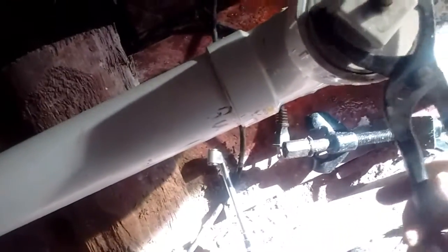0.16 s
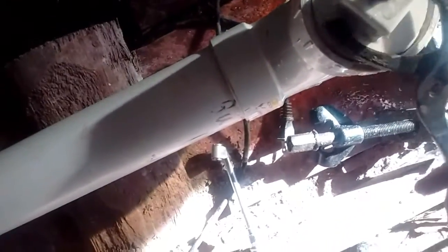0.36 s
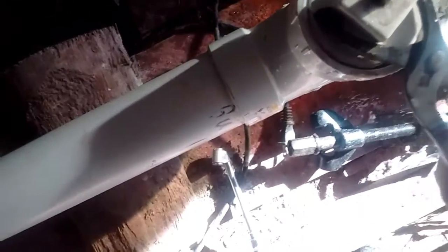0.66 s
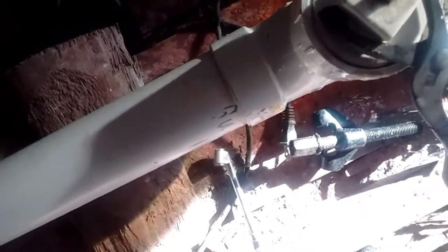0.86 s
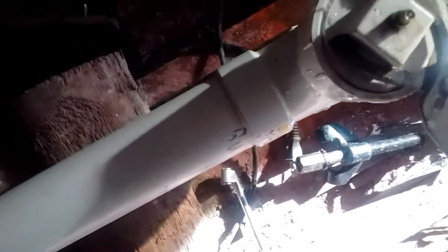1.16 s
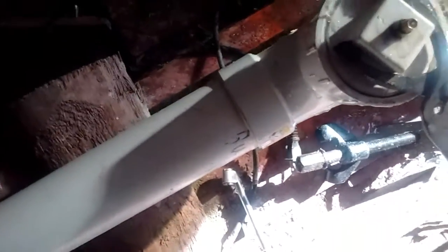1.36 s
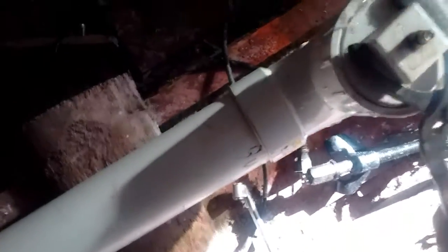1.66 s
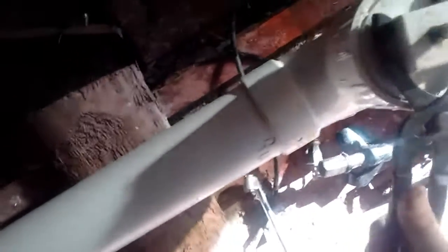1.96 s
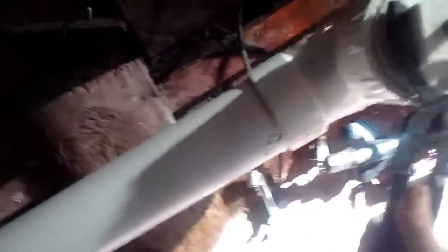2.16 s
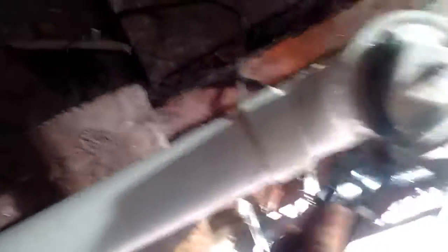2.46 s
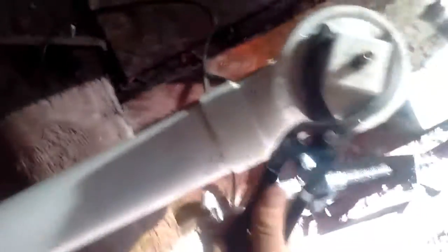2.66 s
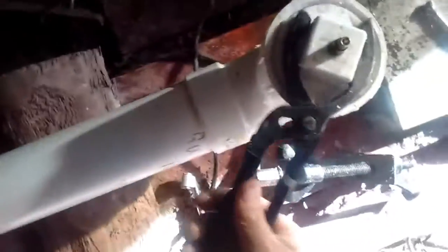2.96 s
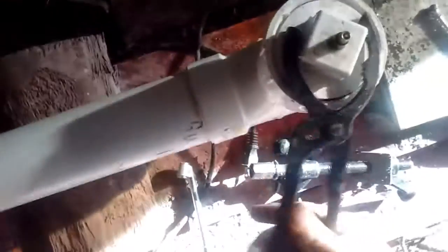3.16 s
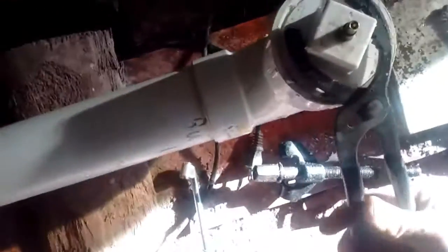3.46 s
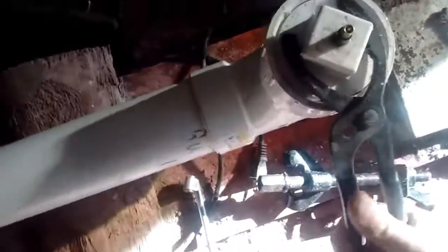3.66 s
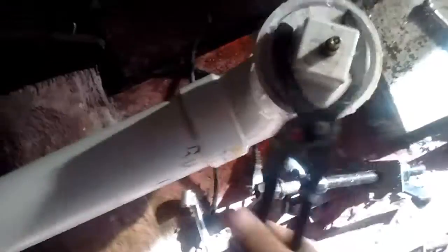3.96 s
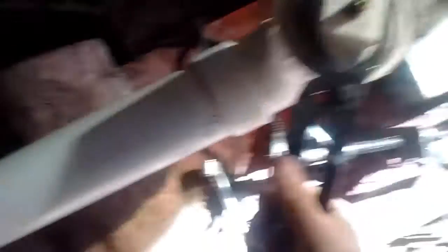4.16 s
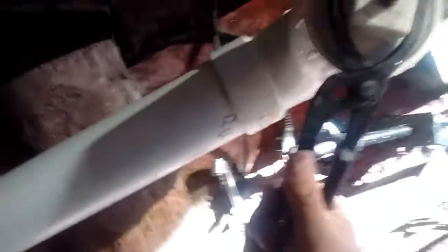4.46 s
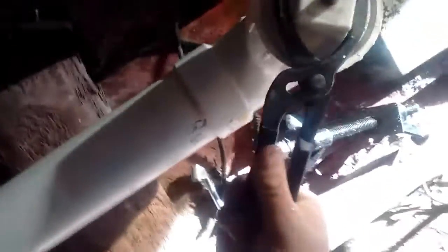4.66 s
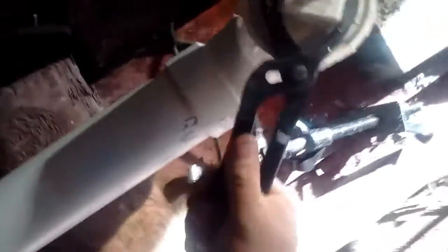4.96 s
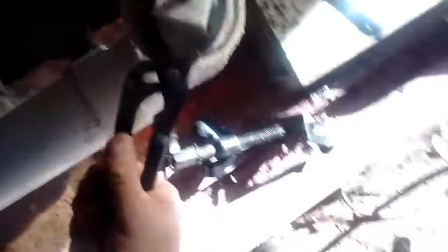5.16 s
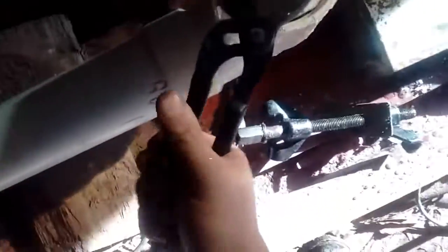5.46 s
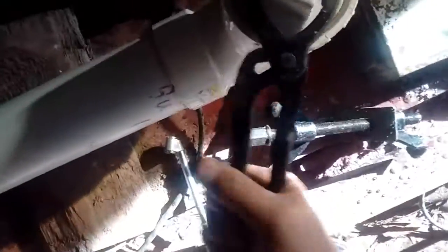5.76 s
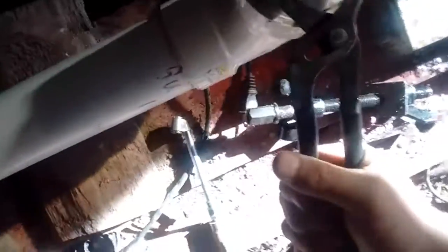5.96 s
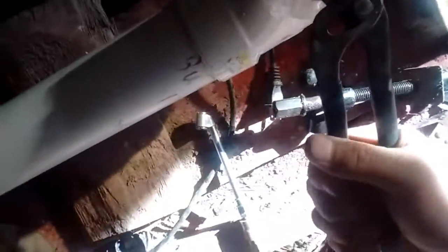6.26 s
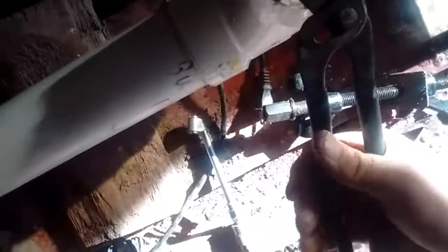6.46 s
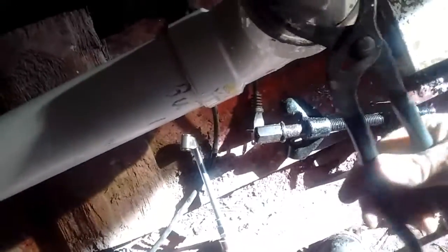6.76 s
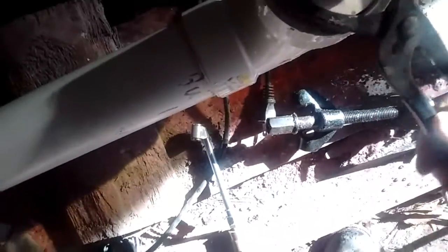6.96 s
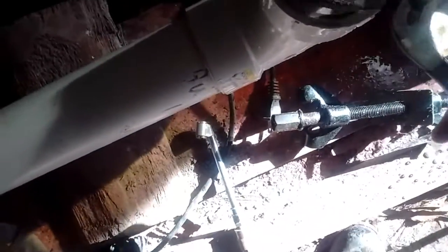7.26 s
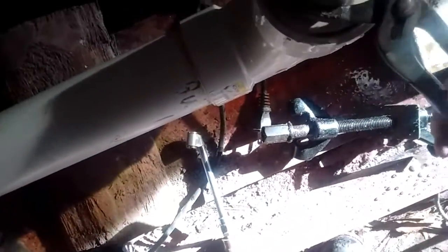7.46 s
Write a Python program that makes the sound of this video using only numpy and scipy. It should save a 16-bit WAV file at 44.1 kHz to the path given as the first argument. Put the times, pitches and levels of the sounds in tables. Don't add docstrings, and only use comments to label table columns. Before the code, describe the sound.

A leak at a plastic pipe first sputters rapidly, crackling and bubbling, with run-off splashing on brick. The spurts then merge into a continuous airy hiss of varying strength. Pliers rub, scuff and knock the hollow pipe, giving low, short thuds and a few sharp clicks, strongest near four and six seconds. Low wind buffets the close, dry microphone; the hiss is full at the end.

```python
import sys
import numpy as np
from scipy import signal
from scipy.fft import rfft, irfft, next_fast_len
from scipy.io import wavfile
from scipy.ndimage import uniform_filter1d

SR = 44100
rng = np.random.default_rng(int(sys.argv[2]) if len(sys.argv) > 2 else 0)


def to_linear_factor(level_db):
    exponent = np.asarray(level_db, float) / 20
    return 10 ** exponent


def inscribe(sig):
    pcm = np.round(np.clip(np.atleast_2d(sig).T, -1, 1) * 32767)
    wavfile.write(sys.argv[1], SR, pcm.astype(np.int16))


N = 335601
T_S = np.arange(N) / SR
STEADY_S = 2.32


def evened(x):
    return x / np.sqrt(np.mean(x ** 2) + 1e-20)


def curve(rows, column):
    rows = np.array(rows)
    return np.interp(T_S, rows[:, 0], rows[:, column])


def add(mix, start_s, sound):
    part = mix[max(round(start_s * SR), 0):][:len(sound)]
    part += sound[:len(part)]


def coloured(x, colour):
    colour_hz, colour_db = np.transpose(colour)
    size = next_fast_len(N)
    hz = np.fft.rfftfreq(size, 1 / SR)
    gain_db = np.interp(np.log(hz + 1), np.log(colour_hz), colour_db, -90, -90)
    return evened(irfft(rfft(x, size) * to_linear_factor(gain_db), size)[:N])


def patchy(patch_db, flicker_db, size=256):
    frames = 4 * N // size + 5
    a, b, patches = rng.standard_normal((frames, size // 2 + 1, 3)).T
    patches = uniform_filter1d(patches, size=4, axis=0)
    patches = evened(uniform_filter1d(patches, size=24, axis=1))
    flicker = evened(uniform_filter1d(rng.standard_normal(frames), size=5))
    z = (a + 1j * b) * to_linear_factor(patch_db * patches + flicker_db * flicker)
    return evened(signal.istft(z, nperseg=size, noverlap=3 * size // 4)[1][:N])


def crackle(per_s, spread_db):
    place, size, sign = rng.random((round(per_s * N / SR), 3)).T
    out = np.zeros(N)
    size_db = spread_db * np.minimum(-np.log(size + 1e-9), 4.2)
    out[(place * N).astype(int)] = to_linear_factor(size_db) * np.sign(sign - .5)
    return evened(out)


def wobble():
    return evened(uniform_filter1d(rng.standard_normal(N), size=300))


def resonate(x, hz, width_hz):
    turn = np.exp(2j * np.pi * np.cumsum(hz) / SR)
    r = np.exp(-np.pi * width_hz / SR)
    return 2 * (turn * signal.lfilter([1 - r], [1, -r], x / turn)).real


def struck(events, partners, rise_s, rough):
    out = np.zeros(N)
    chance = rng.standard_normal((len(events), 5000))
    t = np.arange(5000) / SR
    for (start_s, db, hz, t60_s, upper_db), noise in zip(events, chance):
        ring = np.sin(2 * np.pi * hz * t)
        ring += rough * evened(resonate(noise, hz + 0 * t, 0.74 * hz))
        for ratio, level_db in partners:
            ring += to_linear_factor(level_db + upper_db) * np.sin(2 * np.pi * hz * ratio * t)
        decay = to_linear_factor(db - 60 * t / max(t60_s, .003))
        add(out, start_s, ring * decay * (1 - np.exp(-t / rise_s)))
    return out


def swells(rows, rise_db_per_s, fall_db_per_s, floor_db):
    t = np.arange(0, N, 32) / SR
    db = np.full(len(t), -120.)
    for (start_s, hold_s, top_db), up, down in zip(rows, rise_db_per_s, fall_db_per_s):
        before_s = np.maximum(start_s - t, 0)
        after_s = np.maximum(t - start_s - hold_s, 0)
        db = np.maximum(db, top_db - up * before_s - down * after_s)
    return np.maximum(to_linear_factor(db).repeat(32)[:N], to_linear_factor(floor_db))


# start_s, level_db (relative to spurts), shade_db
SEEP = [
    (0.0, -16.5, 3.5),
    (0.85, -17, -0.5),
    (1.0, -9, 1),
    (1.7, -12, 5),
    (1.95, -16.5, 5),
    (2.25, -10.5, 3),
]
# start_s, level_db, shade_db (by the pliers)
JET = [(2.32, -46.5, 6), (2.45, -35.5, 5), (2.62, -48, 8), (2.76, -46, 2), (3.22, -43, 1), (3.4, -51, 3),
       (3.97, -45, -0.5), (4.08, -51.5, 4), (4.48, -53, 8), (4.62, -42.5, 1), (5.12, -38.5, 2),
       (5.24, -46.5, 10.5), (5.43, -37, 0.5), (5.88, -36, 1), (5.98, -41, 0), (6.87, -37, -2),
       (7.0, -44, 1), (7.61, -38, -2)]


def gap(column):
    return np.where(T_S < STEADY_S, curve(SEEP, column), curve(JET, column))


# pitch_hz, level_db (per Hz)
JET_COLOUR = [(3710, -16), (6300, -18), (7850, -0.5), (8220, -1), (8730, -5.5), (9420, -11.5),
              (10200, -10.5), (11400, -15.5), (12700, -13.5), (14100, -19), (14900, -19.5), (15600, -11.5)]
# start_s, level_db (rms), length_s
SPURTS = [(0.044, -47, 0.022), (0.103, -45.5, 0.016), (0.199, -43, 0.014), (0.264, -46.5, 0.018),
          (0.333, -46, 0.025), (0.398, -41, 0.017), (0.465, -41, 0.033), (0.538, -39.5, 0.014),
          (0.587, -42, 0.023), (0.623, -39.5, 0.014), (0.673, -38, 0.036), (0.753, -36.5, 0.026),
          (0.797, -33.5, 0.0091), (0.828, -32, 0.021), (0.935, -33.5, 0.018), (1.161, -45, 0.039),
          (1.224, -44, 0.02), (1.268, -47, 0.02), (1.307, -42, 0.017), (1.339, -44, 0.029),
          (1.453, -42.5, 0.021), (1.52, -44.5, 0.027), (1.635, -44, 0.027), (1.697, -30.5, 0.0047),
          (1.752, -48, 0.036), (1.83, -46.5, 0.03), (1.896, -37.5, 0.005), (2.112, -39, 0.004),
          (2.172, -48, 0.02), (2.244, -49.5, 0.025)]
# start_s, peak_db, length_s
SPITS = [(0.177, -35, 0.009), (0.1864, -40, 0.009), (0.4324, -33, 0.009), (0.45, -30, 0.009),
         (0.495, -35, 0.009), (0.732, -30, 0.009), (0.8929, -28, 0.009), (0.9024, -33, 0.009),
         (0.9178, -24, 0.009), (0.9802, -31, 0.009), (1.0056, -30, 0.009), (1.0294, -34, 0.009),
         (1.0444, -33, 0.009), (1.0594, -29, 0.009), (1.0794, -33, 0.009), (1.0974, -33, 0.009),
         (1.1218, -33, 0.009), (1.14, -31, 0.009), (1.18, -34, 0.009), (1.4217, -36, 0.009),
         (1.482, -31, 0.009), (1.5658, -33, 0.009), (1.595, -37, 0.009), (1.607, -34, 0.009),
         (2.0617, -39, 0.009), (2.2614, -38, 0.009), (2.2822, -32, 0.009), (2.319, -30, 0.009)]
# start_s, peak_db
TICKS = [(0.2864, -44), (0.2997, -41), (0.3606, -34), (0.4194, -34), (1.3862, -32), (1.7144, -42),
         (1.7344, -38), (1.7994, -45), (1.8771, -30), (1.9044, -42), (1.929, -40), (1.9644, -43),
         (2.0168, -38), (2.0344, -39), (2.0744, -47), (2.1294, -42), (2.1944, -47), (2.2154, -44),
         (2.3032, -30), (2.3344, -32)]


def jet():
    crest_db, tick_s = 9, .003
    spits = [(s, db - crest_db, length_s) for s, db, length_s in SPITS]
    spits += [(s, db - crest_db + 1.5, tick_s) for s, db in TICKS]
    usual_db = uniform_filter1d(curve(sorted(SPURTS + spits), 1), size=4000)
    spurts = np.zeros(N)
    for start_s, db, length_s in SPURTS + spits:
        t = np.arange(0, length_s + 0.016, 1 / SR)
        edge_s = .001 + .12 * length_s
        rise = 1 - np.exp(-t / edge_s)
        fall = np.exp(-np.maximum(t - 0.8 * length_s, 0) / edge_s)
        add(spurts, start_s - .001, to_linear_factor(db - 2.0) * rise * fall)
    steady = to_linear_factor(gap(1) + np.where(T_S < STEADY_S, usual_db, 0))
    crackles = crackle(700, 3.5)
    hiss = coloured(patchy(1.53, 0.79) + 0.36 * crackles, JET_COLOUR) * steady
    hiss += coloured(patchy(4.0, 1.6) + 0.4 * crackles, JET_COLOUR) * spurts
    top = signal.oaconvolve(hiss, signal.firwin(101, 9600, pass_zero=False, fs=SR), "same")
    return hiss + (to_linear_factor(gap(2)) - 1) * top


# start_s, flow_db
WATER = [(0.0, -52.5), (0.14, -53.5), (0.33, -51.5), (0.69, -48.5), (1.32, -47.5), (1.66, -46), (1.98, -51),
         (2.29, -52), (3.05, -46), (3.47, -53.5), (3.82, -53.5), (4.16, -52.5), (4.96, -50), (5.85, -47.5),
         (6.1, -51), (6.87, -47), (6.97, -53), (7.61, -47.5)]


def flow_db():
    return curve(WATER, 1)


def pocket_share():
    return np.interp(T_S, [0, .4, .95, 1.15], [.85, .88, .75, .72])


# start_s, pitch_hz (first), climb_hz_per_s, level_db
GULPS = [(0., 2100, 30000, 0.1), (.065, 3000, 34000, 1), (.113, 2010, 40000, -0.5), (.15, 2700, 45000, 1),
         (.213, 2200, 41700, 0.1), (.275, 2500, 12000, 0), (.36, 2900, 34000, -2), (.418, 4000, 22000, 0.5),
         (.53, 3700, 15000, 0), (.575, 3900, 6000, 1), (.628, 4100, 4000, 2.5), (.713, 3800, 20000, 2),
         (.765, 3920, 6000, 0), (.85, 2700, 34000, 2), (.955, 4100, 6000, 0.1), (2.9, 4600, -15000, 0.1),
         (2.99, 3800, 28000, 1.2), (3.05, 3900, 2000, 0.1), (3.18, 4000, 15000, -1.5),
         (4.86, 3100, 20000, -2.5), (4.92, 3400, 20000, -2.5), (5.195, 3300, 2000, 0.5),
         (5.47, 2800, 32000, 0.5), (5.565, 3200, 9000, -2.5), (5.61, 2400, 40000, -1.5),
         (5.75, 3300, 25000, -2.5), (5.85, 3300, 25000, -2.5), (5.975, 3300, 3000, -1.5),
         (6.06, 3500, 5000, -1.5)]


def gurgle():
    rows = np.array(GULPS)
    current = np.maximum(np.searchsorted(rows[:, 0], T_S) - 1, 0)
    start_s, first_hz, climb, gulp_db = rows[current].T
    since_s = T_S - start_s
    hz = np.minimum(first_hz + climb * since_s, 5000) * (1 + .035 * wobble())
    noise = rng.standard_normal(N) * to_linear_factor(3.5 * wobble())
    pocket = evened(resonate(resonate(noise, hz, 520), hz, 520))
    level = to_linear_factor(flow_db() + gulp_db + 3.6) * pocket_share()
    return level * np.exp(-(since_s / .075) ** 4) * pocket


# pitch_hz, level_db (per Hz)
FIZZ_COLOUR = [(1290, -41), (2200, -24), (2440, -5.5), (2890, -3), (3390, -1.5), (3990, 3), (4640, 4.5),
               (5910, -4.5), (6400, -15), (8320, -43), (14100, -120)]


def fizz():
    bubbles = np.zeros(N)
    for hz, cycles in rng.uniform([3500, 8], [5200, 30], (28, 2)):
        turns = np.arange(round(cycles * SR / hz)) * hz / SR
        ring = np.sin(2 * np.pi * turns * (1 + 0.11 * turns / cycles))
        ring *= np.exp(-3 * turns / cycles) * (1 - np.exp(-turns))
        sizes = crackle(8, 4.0)
        for at in np.flatnonzero(sizes):
            add(bubbles, at / SR, sizes[at] * ring)
    spray = coloured(patchy(3.5, 2.0) + .4 * crackle(300, 3.5), FIZZ_COLOUR)
    spray *= 1.55 - pocket_share()
    return to_linear_factor(flow_db()) * (1.02 * spray + 0.45 * evened(bubbles))


def runoff_db():
    splash_db, slop_db, slop_ends_s = -4.5, 3.5, 1.795
    return flow_db() + splash_db + slop_db * np.clip((slop_ends_s - T_S) / 0.18, 0, 1)


# start_s (hardest moment), level_db, swell_db_per_s
RUBS = [(0.58, -47.5, 90), (2.27, -55, 60), (2.54, -57, 150), (2.68, -64, 150), (2.89, -63, 120),
        (3.25, -44.5, 62), (3.689, -41.5, 250), (4.0, -30, 230), (4.66, -53, 56), (5.09, -41.5, 180),
        (5.34, -41.5, 200), (5.57, -48, 74), (5.96, -34, 130), (6.68, -43, 53), (6.862, -36.5, 144),
        (7.41, -43, 40)]


def rubbing(floor_db):
    pace = [row[2] for row in RUBS]
    return swells([(s, 0, db) for s, db, _ in RUBS], pace, pace, floor_db)


# pitch_hz, level_db (per Hz)
SPLASH_COLOUR = [(59, -24), (100, -12.5), (177, 1.5), (281, -8), (358, -5.5), (713, -9), (1050, -6.5),
                 (1950, -7.5), (2830, -12.5), (3050, -15), (3600, -7.5), (4680, -47), (7920, -120)]


def splash():
    shaken_db = -20
    level = to_linear_factor(runoff_db() + 1.5) + to_linear_factor(shaken_db) * rubbing(-99)
    return level * coloured(patchy(2.25, 1.13) + 0.32 * crackle(120, 4.9), SPLASH_COLOUR)


# pitch_hz, level_db (per Hz)
RUMBLE_COLOUR = [(65, -36), (110, -9), (173, 1.5), (334, 0.5), (447, -5), (560, -9), (674, -9.5),
                 (1130, -11.5), (1530, -17), (2100, -24), (2600, -21), (3380, -55), (5720, -120)]


def rumble():
    drone_db = -5
    level = to_linear_factor(-2.5) * rubbing(runoff_db() + drone_db)
    return level * coloured(patchy(1.55, 2.6, size=512), RUMBLE_COLOUR)


# start_s, peak_db, pitch_hz
POPS = [(0.1355, -25.5, 4800), (0.5322, -27, 4170), (0.7214, -26, 4000), (1.4088, -27.5, 4570),
        (1.4775, -26, 3920), (1.503, -23, 4150), (1.5833, -29, 4250), (1.659, -31, 5040),
        (1.6781, -21, 3540), (1.838, -25.5, 5030), (1.936, -25.5, 4650), (1.9744, -23.5, 4940),
        (2.067, -31, 5130), (2.0996, -25.5, 5070), (2.9968, -21.5, 4100), (3.5248, -21, 4680),
        (3.995, -23, 3670), (4.907, -27.5, 4040), (4.968, -23.5, 4400), (5.1415, -25, 4170),
        (5.2576, -28, 3870), (5.5149, -27, 4550), (5.6427, -25, 4060), (5.798, -25, 4400),
        (5.892, -24.5, 4600), (5.9397, -31, 2580), (6.0187, -28.5, 4360), (6.9184, -23, 2520),
        (7.0753, -27.5, 5200), (.851, -30, 2820), (1.2067, -29, 4500), (1.3708, -30, 3980),
        (1.7459, -30, 4070), (1.945, -29, 4700), (4.683, -33, 3500), (4.51, -35, 4100), (6.0681, -32, 3580),
        (6.341, -32, 4490), (5.985, -32, 3400), (3.3747, -31, 4290), (5.1113, -30, 4290),
        (5.2037, -31, 3350), (5.3293, -30, 3770), (5.375, -33, 3950), (5.7693, -28, 4940),
        (6.2148, -28.5, 4120), (6.4762, -28, 4580), (6.5326, -28, 4240), (7.225, -29, 4430)]


def pops():
    echo_s, echo_db = 0.0076, -7
    echoes = [(s + echo_s, db + echo_db, hz) for s, db, hz in POPS if s < STEADY_S]
    events = [(s, db + 2.0, hz, .012, 0) for s, db, hz in POPS + echoes]
    return struck(events, [(.8, -10.5), (1.1, -8.5)], 0.0012, 0.2)


# pitch_hz, level_db (per Hz)
WIND_COLOUR = [(12, -48), (20, -33), (38, -0.5), (128, 5.5), (149, 4.5), (188, -13), (260, 1.5), (340, -35),
               (570, -120)]
# start_s, hold_s, level_db
GUSTS = [(0.29, .05, -67), (0.56, .02, -67), (0.95, .6, -66), (1.16, .04, -52), (3.0, 0.49, -47),
         (3.95, .05, -62), (4.47, .03, -52), (4.58, .02, -57), (5.1, .02, -61), (5.45, 0.25, -57),
         (5.9, .05, -64), (3.62, 0.13, -62), (6.75, .1, -64), (6.93, .36, -58)]


def wind():
    rise_db_per_s, fall_db_per_s, calm_db = 900, 120, -75
    level = swells(GUSTS, [rise_db_per_s] * len(GUSTS), [fall_db_per_s] * len(GUSTS), calm_db)
    return level * coloured(patchy(0.33, 3.0, size=1024), WIND_COLOUR)


# start_s, peak_db, pitch_hz, t60_s
KNOCKS = [(0.478, -32, 265, 0.12), (0.552, -30.5, 210, 0.12), (0.584, -30, 410, 0.08),
          (2.255, -38.5, 262, 0.092), (2.537, -34, 258, 0.066), (2.653, -38.5, 246, 0.066),
          (2.715, -35.5, 264, 0.057), (2.877, -33, 263, 0.073), (3.078, -26.5, 152, 0.063),
          (3.233, -32.5, 262, 0.057), (3.332, -34.5, 149, 0.1), (3.604, -39, 256, 0.061),
          (3.676, -32.5, 315, 0.11), (3.949, -32, 207, 0.07), (3.955, -27, 289, 0.065),
          (4.36, -40, 263, 0.06), (4.686, -35, 277.4, 0.042), (5.069, -25.5, 261, 0.074),
          (5.927, -27, 217, 0.06), (5.949, -22.5, 200, 0.11), (5.963, -25.5, 349, 0.13),
          (3.925, -35, 270, 0.063), (3.98, -23.5, 214, .08), (4.007, -27.5, 522, 0.084),
          (5.95, -22.5, 530, 0.078), (4.01, -24, 301, 0.09), (3.452, -32, 140, 0.066),
          (6.68, -38, 258, 0.11), (6.849, -30, 280, 0.081), (7.308, -28.5, 250, 0.064),
          (7.395, -26, 282, 0.054)]


def knocks():
    events = [(s, db, hz, t60_s, 0) for s, db, hz, t60_s in KNOCKS]
    return struck(events, [(1.65, -5.5), (2.1, -14), (2.6, -19.5)], 0.0033, 0.36)


# start_s, peak_db, pitch_hz, overtones_db
CLICKS = [(0.479, -27, 985, -15), (0.943, -31, 904, -8), (1.683, -33, 1050, -4), (1.792, -31.5, 1130, -6),
          (2.879, -31, 895, -23), (3.234, -28.5, 885, -15), (3.255, -25.5, 850, -9.5),
          (3.416, -29.5, 1110, -18), (3.658, -32, 1030, -11), (3.671, -25, 1150, -16),
          (3.976, -18, 870, -12), (3.995, -11, 880, -9), (4.654, -29, 870, -16), (4.681, -33, 1050, -17),
          (5.072, -25, 630, -9), (5.435, -28.5, 920, -18), (5.899, -33, 795, -8), (5.941, -12, 890, -9.5),
          (6.859, -29, 980, -5.5), (6.919, -28, 810, -9), (7.026, -29.5, 935, -11.5),
          (7.231, -34.5, 935, -0.5), (7.307, -37, 888, -10), (7.387, -26, 925, -25)]


def clicks():
    events = [(s, db - 4.5, hz, .018, upper_db) for s, db, hz, upper_db in CLICKS]
    return struck(events, [(1.9, 8), (2.4, 4.5), (3.3, -5), (4.6, -3.5)], 0.00052, 0.39)


# start_s, length_s, level_db, pitch_hz
SCUFFS = [(3.662, 0.023, -43.5, 1440), (1.677, 0.023, -33, 3570), (5.3, 0.062, -43.5, 1340),
          (6.9185, .008, -29, 1990), (3.4665, 0.003, -31.5, 7800), (2.845, .004, -38, 4500),
          (3.02, .003, -34, 4000), (4.545, .012, -49, 2050), (6.182, .004, -41, 3500),
          (5.652, .004, -38, 5200), (7.435, .004, -42, 1800), (5.947, 0.023, -38, 600),
          (.9885, .004, -35, 1360), (1.0755, .004, -32, 1500), (4.084, 0.0073, -45, 1540),
          (3.92, .03, -47, 2000), (3.945, .05, -42, 1500), (6.052, .004, -40, 4100)]


def scuffs():
    out = np.zeros(N)
    chance = rng.standard_normal((len(SCUFFS), 6000))
    for (start_s, length_s, db, hz), noise in zip(SCUFFS, chance):
        pitch_hz = np.full(6000, hz)
        rub = evened(resonate(resonate(noise, pitch_hz, 0.52 * hz), pitch_hz, hz))
        rub = rub[:round(length_s * SR)]
        force = signal.windows.tukey(len(rub), .3) * np.linspace(1.3, .5, len(rub))
        add(out, start_s, to_linear_factor(db) * rub * force)
    return out


def pipe():
    highpass = signal.butter(3, 140, "high", fs=SR, output="sos")
    return signal.sosfilt(highpass, rumble() + knocks() + clicks() + scuffs())


def scene():
    mono = jet() + gurgle() + fizz() + splash() + pops() + wind() + pipe()
    return np.array([mono, mono])


def weak_spot_loss_db(hz, z):
    power = uniform_filter1d(abs(z) ** 2 * (hz > 2600), size=7, axis=0)
    power = uniform_filter1d(power, size=5, axis=1) + 1e-16
    below_db = 10 * np.log10(abs(uniform_filter1d(power, size=81, axis=0) / power)) - 11
    return np.clip(12 * below_db, 0, 40) * (hz > 2800)


# mid_hz, half_width_hz_per_db, need_db (jet over flow), most_db (flow)
VALLEYS = [
    (6270, 58, -9, 0),
]
# start_s, shift_hz
VALLEY_SHIFT = [
    (0, 250),
    (2.27, 280),
    (2.36, -150),
    (2.53, -150),
    (2.6, 250),
    (4.6, 150),
    (5.1, -200),
    (5.4, -150),
    (7.61, 150),
]


def empty_valleys(lost_db, hz, t, low_hz, high_hz):
    at = np.minimum(t * SR, N - 1).astype(int)
    shade_db = np.minimum(gap(2)[at], np.where(t < 2.172, 3, 9))
    water_db = flow_db()[at]
    over_db = curve(JET, 1)[at] - water_db
    for mid_hz, widen, need_db, most_db in VALLEYS:
        mid_hz = mid_hz + curve(VALLEY_SHIFT, 1)[at]
        inside = hz > mid_hz - widen * shade_db + low_hz
        inside &= hz < mid_hz + widen * shade_db + high_hz
        shaded = shade_db + low_hz / 90 > 2.9
        lost_db[inside & shaded & (over_db > need_db) & (water_db < most_db)] = 50
    in_slit = abs(hz - 3020 - high_hz) < 70
    slit_open = over_db * .7 + shade_db * .8 + low_hz / 25 > 7
    lost_db[in_slit & slit_open & (t > 2.6)] = 25


# start_s, end_s, mid_hz, half_width_hz, loss_db
HOLLOWS = [(.97, 1.48, 3150, 450, 6), (1.12, 1.21, 3300, 150, 12), (1.1, 1.18, 6550, 220, 22),
           (1.33, 1.46, 6550, 220, 22), (1.5, 1.665, 6550, 240, 28), (1.76, 1.89, 6500, 240, 20),
           (2.01, 2.08, 3550, 190, 20), (2.24, 2.33, 3600, 190, 30), (2.29, 2.45, 3370, 360, 50),
           (2.49, 2.555, 3450, 260, 35), (2.21, 2.31, 6400, 400, 30), (2.27, 2.31, 5600, 500, 16),
           (5.1, 5.34, 3000, 150, 32), (5.38, 5.47, 2950, 110, 18), (5.16, 5.23, 4950, 110, 20),
           (5.18, 5.23, 7200, 200, 14), (3.24, 3.36, 6450, 160, 22), (4.53, 4.62, 6400, 200, 28),
           (4.78, 4.83, 6500, 230, 30), (5.97, 6.045, 6300, 200, 22), (6.02, 6.1, 2950, 150, 12),
           (6.48, 6.66, 3120, 150, 18), (6.76, 6.83, 3050, 150, 16), (6.99, 7.04, 3300, 200, 18),
           (7.06, 7.14, 3100, 200, 25), (7.165, 7.205, 3000, 200, 25), (7.23, 7.37, 6400, 200, 28),
           (7.42, 7.58, 3100, 120, 15), (7.53, 7.61, 6450, 250, 22)]


def hollow_loss_db(hz, t, low_hz):
    lost_db = 0
    for start_s, end_s, mid_hz, half_hz, db in HOLLOWS:
        depth = np.clip(3 - 3 * abs(hz - mid_hz - low_hz / 3) / half_hz, 0, 1)
        lost_db = lost_db + db * depth * ((t > start_s) & (t < end_s))
    return lost_db


def roll_off(x):
    return signal.sosfilt(signal.butter(12, 15750, fs=SR, output="sos"), x)


def record(dry):
    hz, t, z = signal.stft(dry[0], SR, nperseg=1024, noverlap=768)
    hz = hz[:, None]
    ragged_hz = rng.uniform([-170, -60], [60, 170], (len(t) // 4 + 1, 2))
    low_hz, high_hz = ragged_hz.repeat(4, axis=0)[:len(t)].T
    lost_db = weak_spot_loss_db(hz, z)
    empty_valleys(lost_db, hz, t, low_hz, high_hz)
    lost_db += hollow_loss_db(hz, t, low_hz)
    kept = signal.istft(z * to_linear_factor(-lost_db), nperseg=1024, noverlap=768)[1][:N]
    kept = signal.oaconvolve(kept, signal.firwin(511, 15640, window=("kaiser", 9), fs=SR), "same")
    return roll_off(np.array([kept, kept]))


dry = scene()
out = record(dry)
inscribe(out)
```